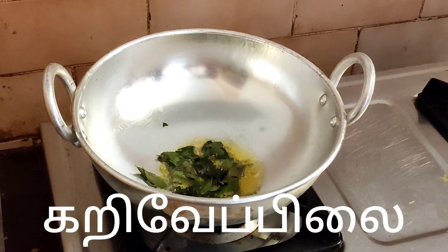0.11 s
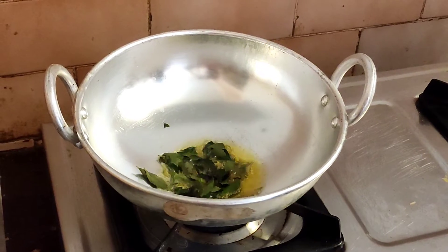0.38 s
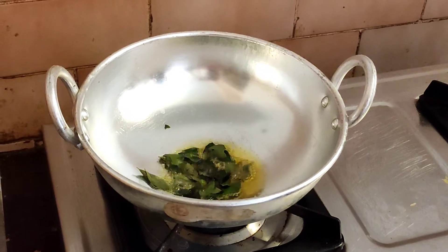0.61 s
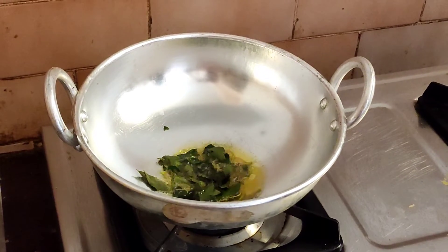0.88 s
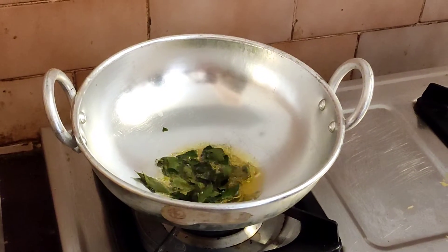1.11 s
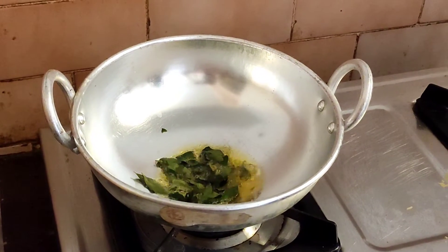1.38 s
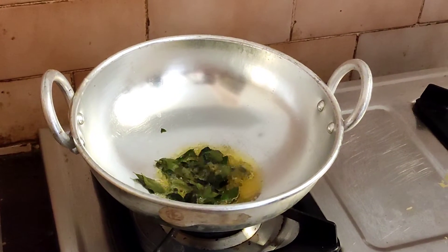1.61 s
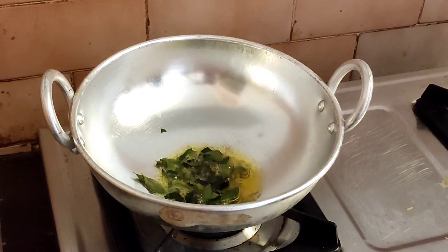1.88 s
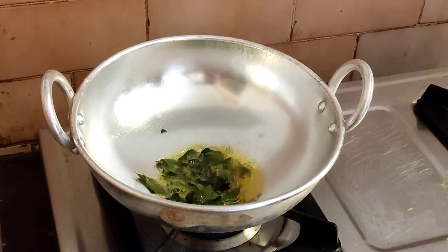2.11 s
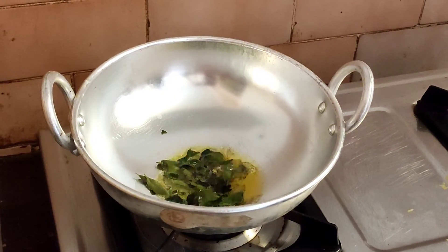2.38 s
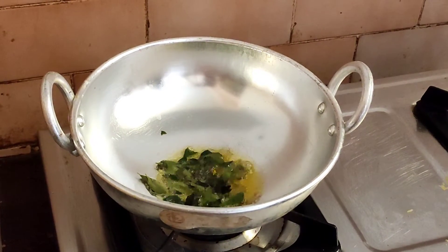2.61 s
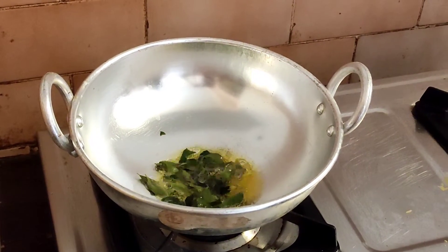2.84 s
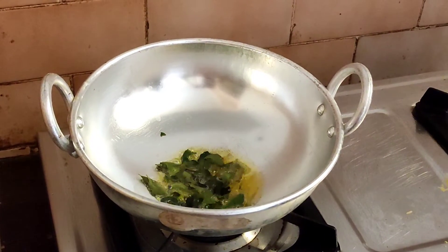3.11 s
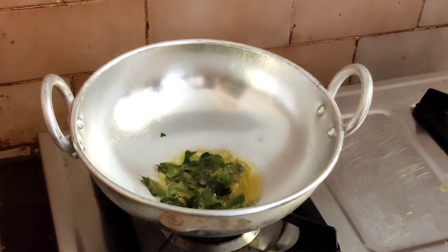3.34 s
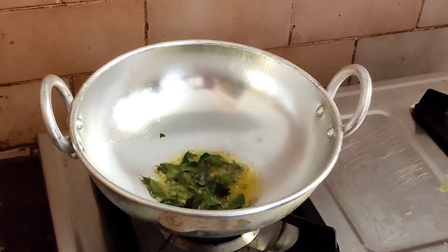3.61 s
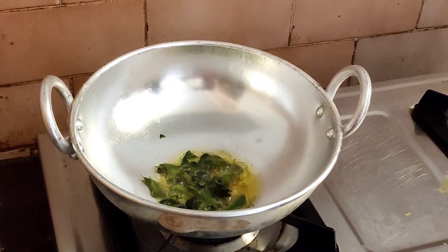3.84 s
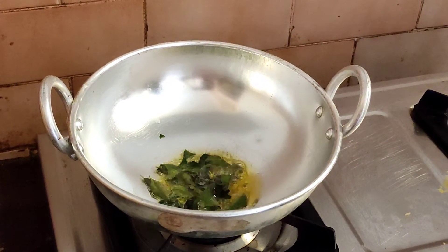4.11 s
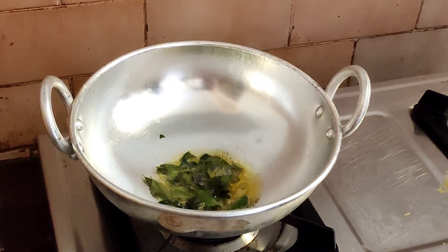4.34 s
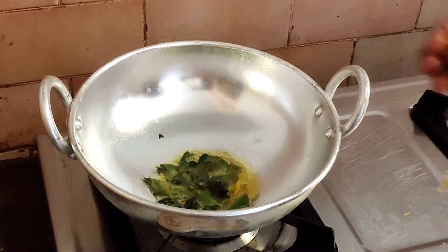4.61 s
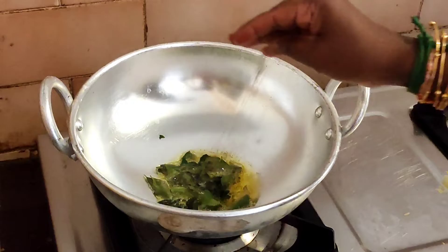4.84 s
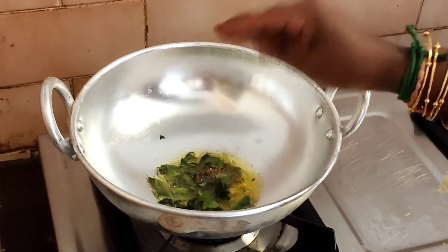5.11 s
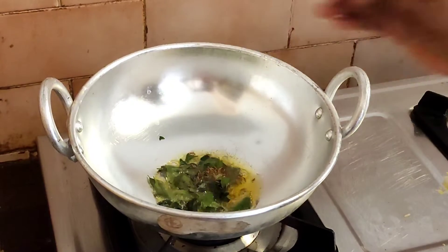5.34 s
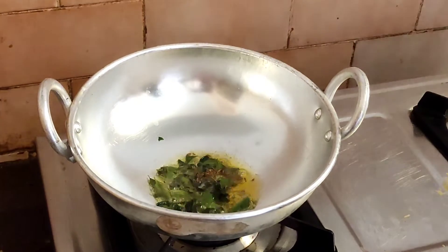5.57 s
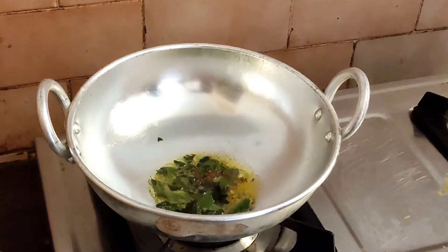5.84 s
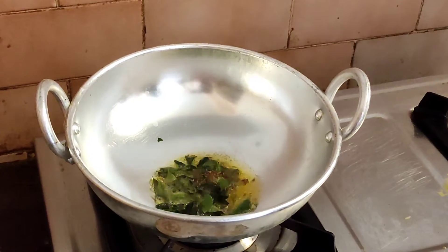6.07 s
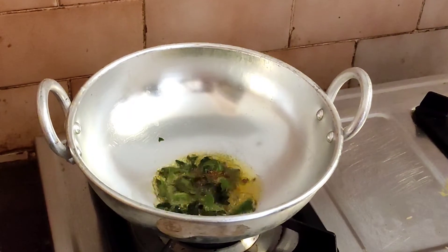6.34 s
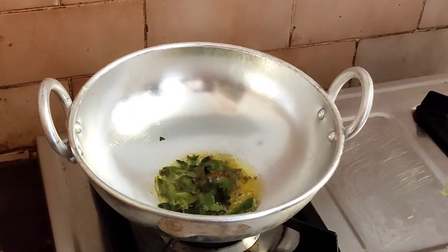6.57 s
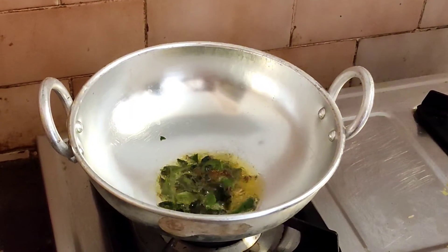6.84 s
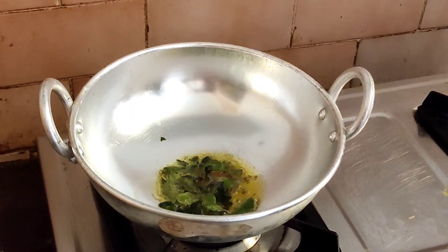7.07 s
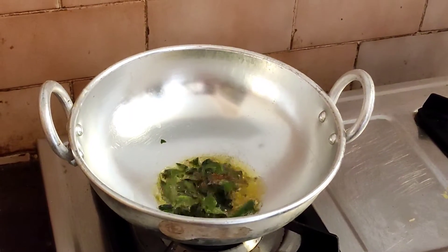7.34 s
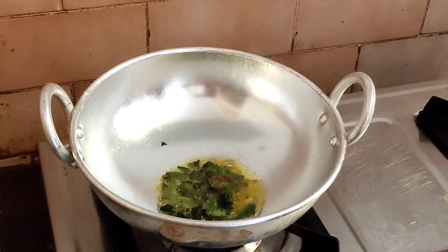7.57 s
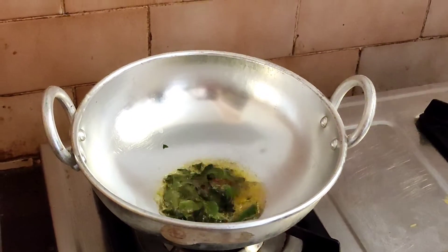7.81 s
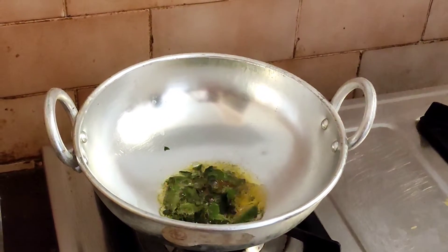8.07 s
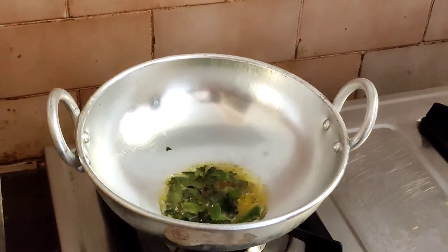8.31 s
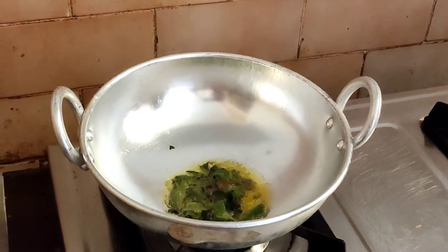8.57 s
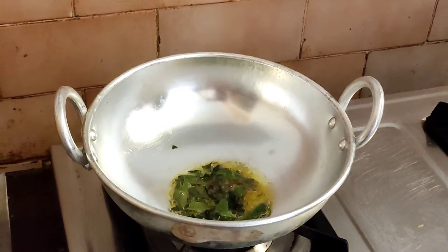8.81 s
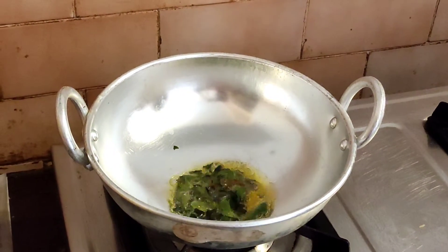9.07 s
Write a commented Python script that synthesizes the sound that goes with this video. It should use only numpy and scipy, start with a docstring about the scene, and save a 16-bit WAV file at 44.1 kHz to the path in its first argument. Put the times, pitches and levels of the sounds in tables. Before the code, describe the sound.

Green leaves and seeds fry in shallow hot oil in a thin round metal pan. A dense, bright fizz runs throughout, dotted with sharp irregular pops, loud and soft, and a few dull low knocks. It dips briefly near the start, then pops grow more frequent towards the middle. Close phone microphone, stereo, in a small hard-walled tiled kitchen, with faint flame hiss and low rumble beneath.

```python
"""In a tiled kitchen, seeds and leaves fry in a little hot oil in a thin round metal pan, an arm's
length from a phone. Steam bubbles burst as single pops, loud and soft, and a few low knocks, each a
decaying sine with a snap, over a dense fizz of many more. The pan rings faintly as a set of damped
modes, and the hard walls smear every pop into a tail of decaying noise. Below lie the hiss of the gas
flame and the rumble and wavering hum of the house, all made of filtered noise."""
import sys
import numpy as np
from scipy import signal
from scipy.fft import rfft, irfft
from scipy.io import wavfile
from scipy.ndimage import uniform_filter1d

SR = 44100
rng = np.random.default_rng(int(sys.argv[2]) if len(sys.argv) > 2 else 0)


def field_ratio(decibels):
    """Amplitude ratio for a level in dB (20 dB per decade); scalars and array-likes work."""
    return 10 ** (np.asarray(decibels, dtype=float) / 20)


def transcribe(u):
    """Save the signal u as a 16-bit wav file named by the first command-line argument.

    u: samples, shape (n,) or (channels, n), limited to [-1, 1]; the rate is SR.
    q: integer samples, one column per channel.
    """
    v = np.clip(np.atleast_2d(u).T, -1, 1)
    q = np.round(v * 32767).astype(np.int16)
    wavfile.write(sys.argv[1], SR, q)


N = 405279  # length [samples]

# flame hiss and house rumble, shape of the spectrum: (frequency [Hz], relative density [dB per Hz])
AIR_SPECTRUM = [(20, 4), (35, -6.5), (50, -3.5), (86, -7.5), (130, -13.5), (170, -16.5), (400, -19),
                (800, -36), (1500, -35), (4000, -35), (9000, -21.5), (14000, -27.5)]
# hum of the house, narrow bands of noise: (centre [Hz], width [Hz], level [dB])
HUM_BANDS = [(87, 20, -72), (258, 20, -82)]
# first arrivals, straight and off the pan wall, tiles and counter:
# (left delay [ms], left gain [factor], right delay [ms], right gain [factor])
FIRST_ARRIVALS = [(0, 4.6, .27, 1.9), (.9, -1.9, 1.1, 2.1), (1.7, 1.1, 4.5, 2.2), (4.4, .9, 5.6, -1.5),
                  (7.6, 1.8, 7.9, .9)]
# the kitchen by pitch: (frequency [Hz], tail t60 [s], left minus right [dB],
# likeness of the ears [0-1], colour [dB])
ROOM = [(298, 0.35, -1, 0.6, -9), (530, 0.72, -3.5, 1, -6.5), (750, 0.68, 3.5, 0.03, -3),
        (1005, 0.61, 0.5, 0.16, -5.5), (2490, 0.68, .8, 0.01, 4), (4400, 0.74, -1.6, 0.11, 3),
        (6940, 0.38, -6, 0.4, 5.5), (10060, 1, -8.5, 1, 0.96), (14200, 0.073, 0, 0, 1.5)]
# modes of the pan: (frequency [Hz], level before a weight that rises with frequency [dB], t60 [s])
PAN_MODES = [(258, -26, .25), (437, -24, .2), (640, -21, .15), (759, -15, .2), (856, -18, .2),
             (980, -22, .2), (1425, -20, .15), (1645, -19, .12), (2060, -28, .15), (2330, -28, .15),
             (2896, -26, .15), (3207, -26, .15), (3630, -25, .12), (4360, -27, .15), (6970, -27, .08)]
# activity of the small bubbles: (time [s], level [dB])
FIZZ_LEVEL = [(0, -47.5), (.2, -52.5), (.36, -57), (.42, -49.5), (1.3, -48.5), (1.95, -48.5), (2.2, -47.5),
              (4.2, -48), (4.85, -46), (5.4, -46.5), (6.4, -46), (6.7, -47), (9.19, -47.5)]
# loudness of the small bubbles by pitch: (frequency [Hz], relative level [dB])
FIZZ_PITCH_LEVEL = [(600, -13), (1200, -5.5), (1700, 1.5), (2800, 7), (3800, 9), (5100, 5), (7100, 13),
                    (8800, 6), (13500, 8.5)]
# single pops, loud and soft, and a few low knocks:
# (time [s], strength [dB], starting pitch [Hz], ring until 1/e [cycles])
SINGLE_POPS = [(0.006, -30, 2650, 0.32), (0.0472, -37, 8500, 0.73), (0.118, -21, 2390, 0.12),
               (0.1369, -31, 4000, 0.17), (0.174, -32, 3000, 0.46), (0.3859, -28.5, 8800, 1.6),
               (0.4295, -30, 8400, 0.75), (0.524, -29, 4530, 0.14), (0.5809, -28, 1950, 0.6),
               (0.7603, -30, 3700, 3.2), (0.893, -34, 12500, 1.6), (0.9568, -33, 4860, 0.33),
               (0.9828, -28, 278, 0.96), (1.0292, -33, 2090, 0.54), (1.137, -38.5, 8550, 2.0),
               (1.246, -33.5, 7340, 4.1), (1.4453, -35.5, 7050, 1.2), (1.525, -29, 3600, 0.57),
               (1.5689, -33, 1830, 0.45), (1.7582, -30, 635, 0.33), (1.8181, -32.5, 2840, 1.4),
               (2.0457, -36, 3200, 0.55), (2.073, -20.5, 2020, 0.44), (2.1366, -32, 7450, 2.3),
               (2.2989, -25.5, 3150, 1.5), (2.4106, -29.5, 2660, 1.6), (2.525, -34.5, 7340, 4.5),
               (2.6196, -27.5, 4180, 2.8), (2.7982, -26.5, 5900, 1.2), (2.883, -28, 5370, 0.39),
               (3.0436, -27, 2200, 0.17), (3.0985, -29.5, 3300, 0.35), (3.1453, -28, 1980, 0.25),
               (3.163, -32, 6500, 3.2), (3.2196, -24.5, 3160, 0.68), (3.4082, -29.5, 2410, 0.39),
               (3.4386, -29.5, 2660, 0.48), (3.5053, -28.5, 1810, 1.3), (3.5456, -29.5, 6940, 1.1),
               (3.5631, -24.5, 2470, 0.54), (3.6604, -32, 750, 0.4), (3.765, -34, 6650, 2),
               (3.8494, -32.5, 1290, 0.17), (3.9105, -33.5, 3250, 1), (3.9427, -29.5, 3750, 1.9),
               (4.0141, -28.5, 2080, 0.76), (4.1192, -29.5, 4600, 0.44), (4.1454, -28.5, 1180, 0.14),
               (4.191, -28.5, 5330, 5.3), (4.392, -25.5, 3880, 8.6), (4.444, -27.5, 3400, 1.3),
               (4.4753, -32, 4320, 0.51), (4.677, -31, 9150, 0.82), (4.7454, -33, 5230, 0.44),
               (4.9405, -30.5, 3600, 1), (4.9639, -24, 2350, 0.6), (5.023, -31, 4270, 0.17),
               (5.171, -27.5, 2800, 0.79), (5.2139, -31.5, 2040, 0.52), (5.2466, -25.5, 3520, 1.4),
               (5.3049, -26.5, 1870, 0.74), (5.3347, -32.5, 5800, 2.3), (5.449, -29.5, 3000, 0.66),
               (5.514, -24.5, 2120, 0.37), (5.5528, -32, 4360, 2.1), (5.6306, -27, 2930, 1.2),
               (5.6434, -30.5, 5300, 1.5), (5.689, -28, 3580, 0.36), (5.774, -31, 4070, 2),
               (5.808, -24.5, 2600, 5.3), (5.8803, -28.5, 5250, 1.2), (5.8958, -25, 2750, 1.1),
               (5.9834, -27, 3710, 3.5), (6.0626, -28.5, 5240, 0.44), (6.1169, -29, 5000, 1.5),
               (6.2211, -32, 1030, 0.63), (6.246, -29, 2470, 0.4), (6.304, -29, 5700, 0.48),
               (6.436, -29.5, 3830, 1.2), (6.449, -28, 233, 1.3), (6.4598, -33.5, 3200, 1.7),
               (6.7378, -30.5, 2860, 1.6), (6.804, -26.5, 3060, 1), (6.9479, -25.5, 4400, 1.3),
               (7.0607, -35.5, 7000, 5.8), (7.2328, -30.5, 3380, 1.8), (7.2583, -29.5, 5470, 0.42),
               (7.3998, -33, 4730, 1.9), (7.482, -26.5, 2070, 1.2), (7.616, -32.5, 3430, 1.1),
               (7.7162, -29.5, 3700, 0.7), (7.805, -28, 4000, 0.52), (7.86, -28.5, 4600, 0.85),
               (7.9971, -28.5, 4100, 2.4), (8.026, -30, 2050, 1.1), (8.0985, -32, 2360, 0.61),
               (8.1464, -30.5, 4640, 2.2), (8.3256, -28, 3520, 1.6), (8.4235, -28.5, 4460, 2),
               (8.5158, -26, 2440, 0.71), (8.65, -31, 150, 1.5), (8.669, -31, 4400, 0.42),
               (8.7035, -31, 2200, 0.52), (8.759, -35, 6600, 2), (8.8681, -31.5, 5670, 1.3),
               (8.975, -36.5, 10400, 3.0), (9.0142, -30, 4740, 3.4), (9.0528, -32, 2810, 0.91),
               (9.1312, -31.5, 3520, 0.86)]


def band(x, lo_hz, hi_hz):
    """A resonant band: second-order slopes on each side."""
    sos = signal.butter(2, [lo_hz, min(hi_hz, .45 * SR)], "bandpass", fs=SR, output="sos")
    return signal.sosfilt(sos, x)


def on_log(hz, table, column):
    """Pitch is logarithmic: a table column is interpolated on a log-frequency axis."""
    table = np.array(table, float)
    return np.interp(np.log(hz), np.log(table[:, 0]), table[:, column])


def pair(likeness, size):
    """Interaural coherence: mixing common and opposed noise sets the correlation of two ears."""
    common, opposed = rng.standard_normal((2, size))
    likeness = np.clip(likeness, 0, 1)
    sign = np.array([[1], [-1]])
    return np.sqrt((1 + likeness) / 2) * common + np.sqrt((1 - likeness) / 2) * opposed * sign


def flame_and_rumble(level_db=-56.5, left_lean_db=.8, swell_db=1.8, swell_below_hz=170):
    """Turbulence is broadband noise shaped by a spectrum; its low rumble swells unevenly."""
    hz = np.maximum(np.fft.rfftfreq(N, 1 / SR), 5)
    shape = field_ratio(on_log(hz, AIR_SPECTRUM, 1)) * hz ** 2 / (hz ** 2 + 3.8 ** 2)
    noise = irfft(rfft(pair(.25, N), axis=1) * shape, N, axis=1)
    noise = field_ratio(level_db + left_lean_db * np.array([[1], [-1]])) * noise / noise.std()
    # four random swell points a second, joined by straight lines
    swell = np.interp(np.arange(N) / SR, np.arange(40) / 4, rng.standard_normal(40))
    low_pass = signal.butter(2, swell_below_hz, fs=SR, output="sos")
    rumble = signal.sosfiltfilt(low_pass, noise)
    return noise + (field_ratio(swell_db * swell) - 1) * rumble


def hum():
    """Narrow-band noise is heard as a tone whose envelope wavers at random."""
    out = 0
    for hz, width_hz, db in HUM_BANDS:
        tone = band(pair(0.85, N), hz - width_hz / 2, hz + width_hz / 2)
        out = out + field_ratio(db) * tone / tone.std()
    return out


def first_arrivals(size):
    """Discrete early sound: each straight or reflected route is one delayed, scaled impulse per ear."""
    out = np.zeros((2, size))
    shifts = rng.standard_normal((len(FIRST_ARRIVALS), 2))
    for (left_ms, left, right_ms, right), shift in zip(FIRST_ARRIVALS, shifts):
        late_ms = 0.092 * min(left_ms, 1) * shift  # every spot has its own path lengths
        out[0, int((left_ms + late_ms[0]) * SR / 1000)] += left
        out[1, int((right_ms + late_ms[1]) * SR / 1000)] += right
    return out


def wall_tail(t, early_db=-17, tail_db=-18):
    """Reverberation is noise that decays exponentially, at a rate of its own in each band."""
    # early on the echoes are few and uneven, later they merge
    uneven = uniform_filter1d(rng.standard_normal((2, len(t))), size=9)
    sparse = field_ratio(4.98 * 3.77 * np.exp(-t / 0.033) * uneven)
    onset = 1 - np.exp(-t / 0.002)
    out = 0
    for hz in 250 * 2 ** np.arange(0, 6.1, .5):  # half-octave bands
        t60 = on_log(hz, ROOM, 1)
        # the corner round the stove answers first and dies fast; the whole room lingers
        corner = field_ratio(early_db - 60 * t / (0.17 * t60))
        room = field_ratio(tail_db - 60 * t / t60)
        noise = pair(on_log(hz, ROOM, 3), len(t))
        out = out + band((corner + room) * onset * sparse * noise, hz / 2 ** .25, hz * 2 ** .25)
    return out


def pan_ring(t):
    """Modal synthesis: a struck plate is a sum of damped sines, here detuned a little for each spot."""
    out = 0
    for (hz, db, t60), (tune, left, right) in zip(PAN_MODES, rng.random((len(PAN_MODES), 3))):
        turns = hz * (1 + 0.014 * (tune - .5)) * t + np.array([[left], [right]])
        weight = hz / SR * 10
        out = out + weight * field_ratio(db - 60 * t / t60) * np.sin(2 * np.pi * turns)
    return out


def path():
    """Impulse response from one spot in the oil to both ears: arrivals, walls and pan superpose."""
    t = np.arange(int(.5 * SR)) / SR
    return first_arrivals(len(t)) + wall_tail(t) + pan_ring(t)


def fizz(mean_per_s=550, stir_db=14.0, settle_s=0.089):
    """A random point process of small bubbles; each single pop stirs the oil and they grow briefly."""
    when, pitch, length, big = rng.random((int(mean_per_s * N / SR), 4)).T
    s = when * N / SR
    hz = 600 * (16000 / 600) ** pitch
    pop_s, pop_db = np.transpose(SINGLE_POPS)[:2]
    since = s[:, None] - pop_s
    settling = (since > 0) * np.exp(-np.abs(since) / settle_s)
    stirred = np.sum(settling * field_ratio(pop_db + stir_db) ** 2, axis=1)
    db = np.interp(s, *np.transpose(FIZZ_LEVEL)) + on_log(hz, FIZZ_PITCH_LEVEL, 1)
    db = db - 2.12 * np.log(big + 0.019)  # most are small, a few much stronger
    db = db + 6.6 * np.log10(stirred + 0.039)
    return s, db, hz, .5 + 2.4 * length


def spatter(per_s=10, over_fizz_db=12, scatter_db=1, middle_hz=5010, spread_octaves=0.714, ring_ms=.4):
    """A jittered point process: one middling bubble in every short while, its level following the fizz."""
    count = int(per_s * N / SR)
    s = (np.arange(count) + rng.random(count)) / per_s
    big, pitch, length = rng.standard_normal((count, 3)).T
    hz = np.clip(middle_hz * 2 ** (spread_octaves * pitch), 700, 13000)
    db = np.interp(s, *np.transpose(FIZZ_LEVEL)) + over_fizz_db + scatter_db * big
    # the higher the pitch, the more cycles they ring
    cycles = hz * ring_ms / 1000 * 2 ** (1.1 * length)
    return s, db, hz, cycles


def bubbles(s, db, hz, cycles, rise=0.018, snap=0.22, size=900):
    """A cavity resonator: the skin snaps and a dying sine climbs as it closes; dB sets the sine's energy."""
    turns = hz[:, None] * np.arange(size) / SR
    decay = np.exp(-turns / np.maximum(cycles, .2)[:, None])
    ring = decay * np.sin(2 * np.pi * turns * (1 + rise * np.tanh(turns / 4)))
    ring /= np.sqrt(np.sum(ring ** 2, axis=1))[:, None]
    ring[:, 1] += snap
    at = (s * SR).astype(int)[:, None] + np.arange(size)
    pops = np.bincount(at.ravel(), (ring * field_ratio(db)[:, None]).ravel(), N + 2 * size)[:N]
    # the pops carry little bass
    return signal.sosfilt(signal.butter(1, 450, "highpass", fs=SR, output="sos"), pops)


def frying(spots=5, level_db=-3):
    """Linear superposition: bubbles burst at a few spots, each convolved with its own impulse response."""
    s, db, hz, cycles = np.hstack([np.transpose(SINGLE_POPS), spatter(), fizz()])
    out = 0
    for spot in range(spots):
        mine = slice(spot, None, spots)
        pops = bubbles(s[mine], db[mine], hz[mine], cycles[mine])
        out = out + signal.fftconvolve(pops[None], path(), axes=1)[:, :N]
    return field_ratio(level_db) * out


def scene():
    """Diffraction round the phone's body shades its two ports by pitch; the quiet kitchen adds to the pan."""
    hz = np.maximum(np.fft.rfftfreq(N, 1 / SR), 5)
    half_lean_db = on_log(hz, ROOM, 2) / 2 * np.array([[1], [-1]])
    shading = field_ratio(on_log(hz, ROOM, 4) + half_lean_db)
    pan = irfft(rfft(frying(), axis=1) * shading, N, axis=1)
    return pan + flame_and_rumble() + hum()


def roll_off(x):
    """The treble ends steeply here."""
    return signal.sosfilt(signal.butter(12, 14430, fs=SR, output="sos"), x)


def record(dry, top_hz=14300):
    """Band limiting: a steep zero-phase low-pass cuts the top of the treble."""
    top_cut = signal.ellip(8, .1, 60, top_hz, fs=SR, output="sos")
    mix = signal.sosfiltfilt(top_cut, dry)
    return roll_off(mix)


dry = scene()
out = record(dry)
transcribe(out)
```